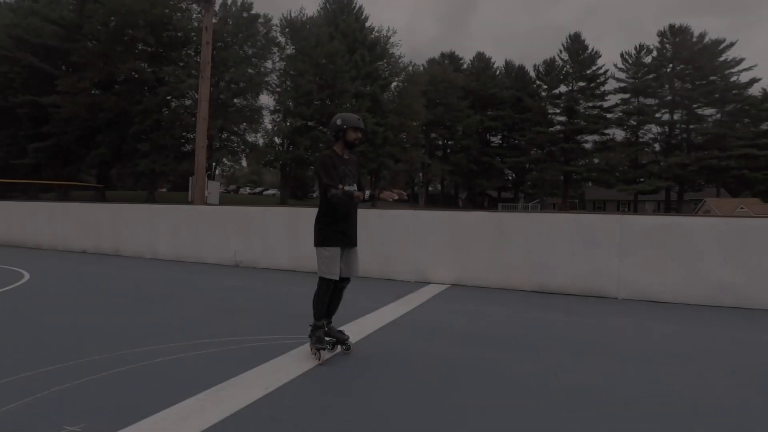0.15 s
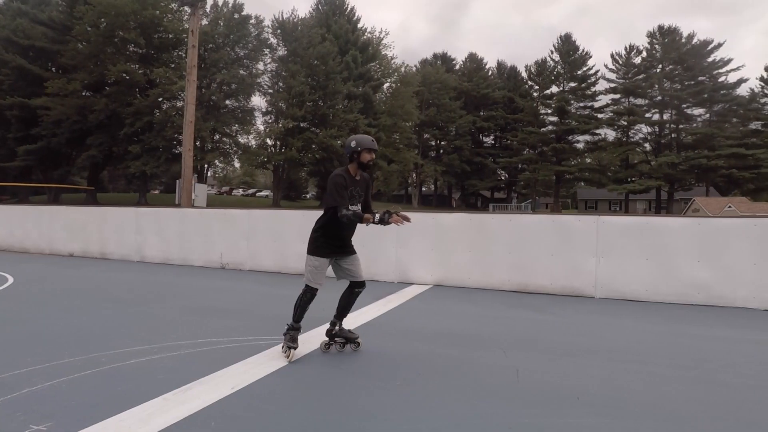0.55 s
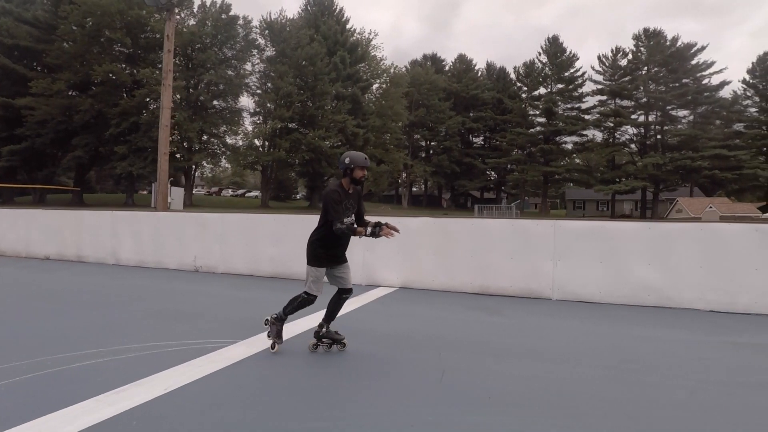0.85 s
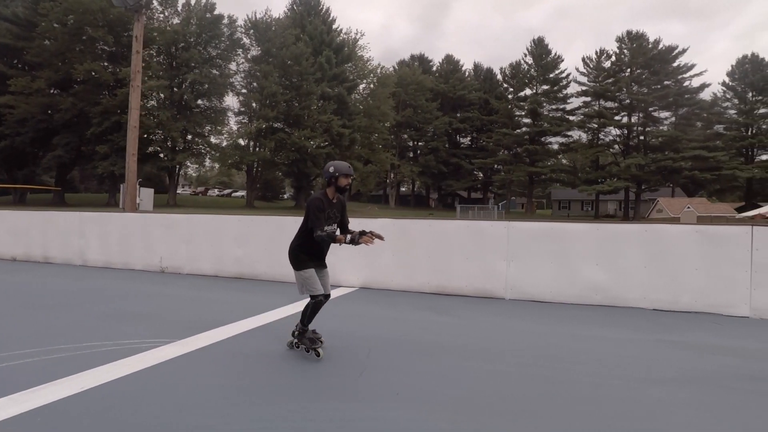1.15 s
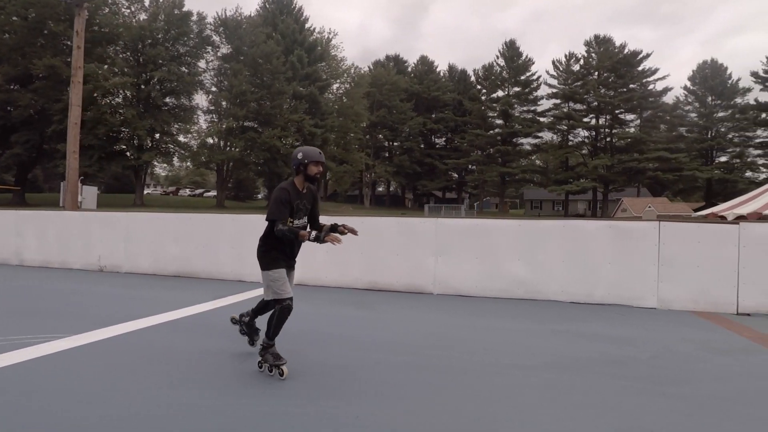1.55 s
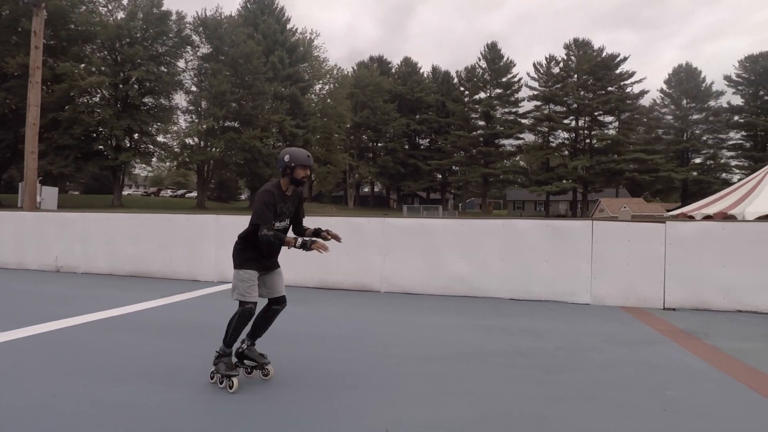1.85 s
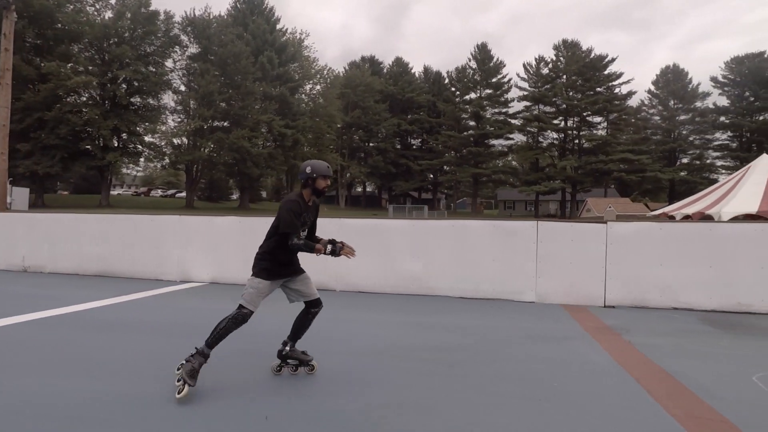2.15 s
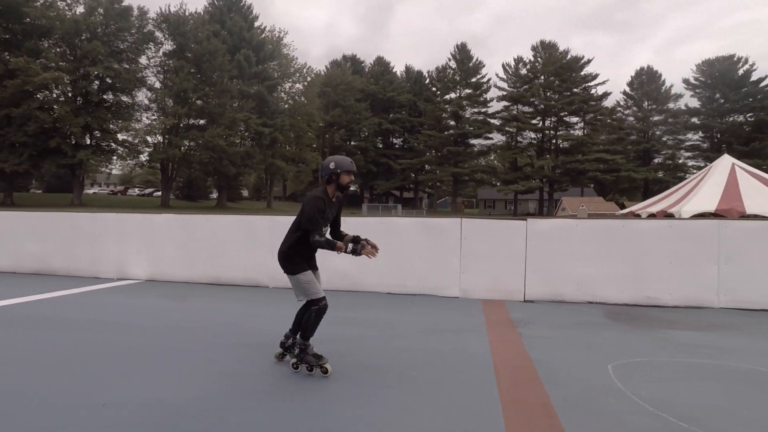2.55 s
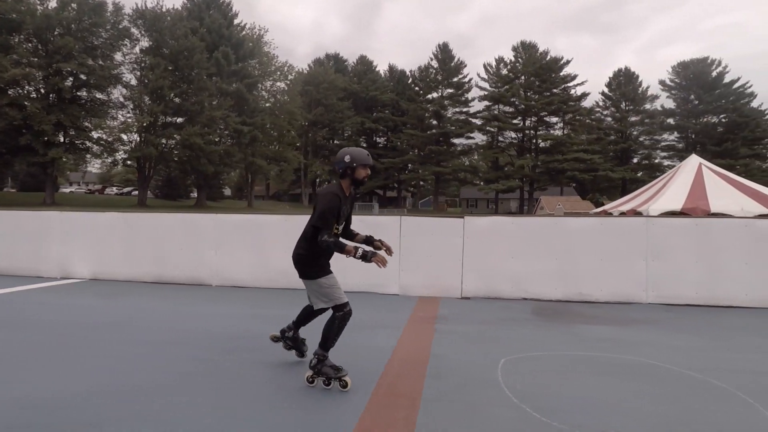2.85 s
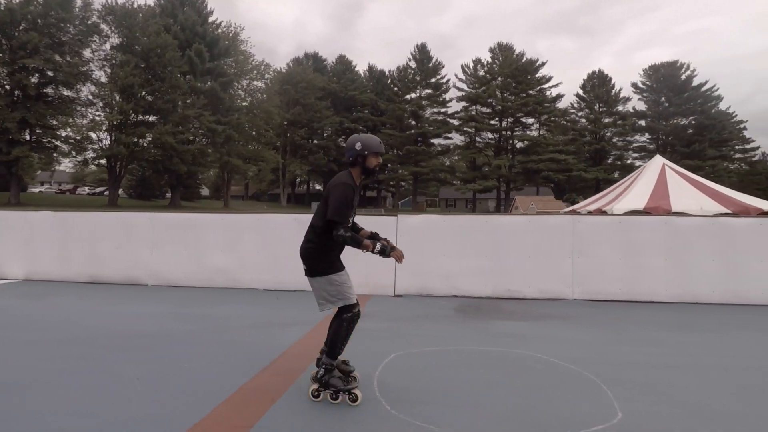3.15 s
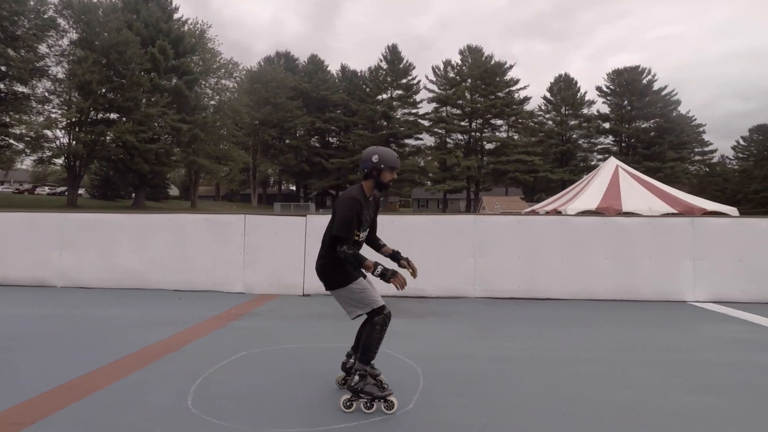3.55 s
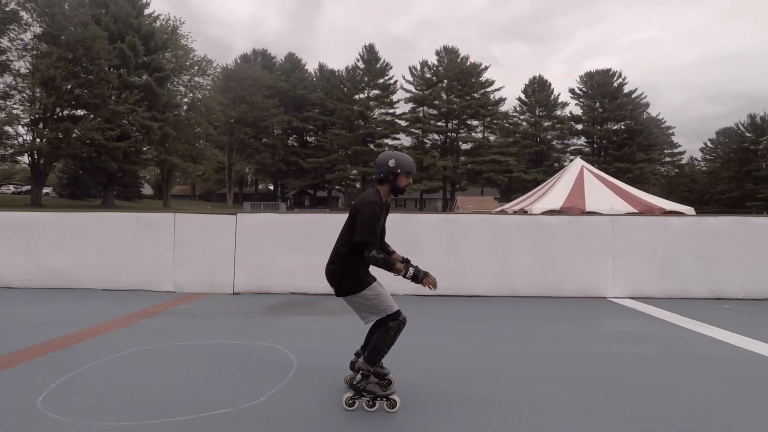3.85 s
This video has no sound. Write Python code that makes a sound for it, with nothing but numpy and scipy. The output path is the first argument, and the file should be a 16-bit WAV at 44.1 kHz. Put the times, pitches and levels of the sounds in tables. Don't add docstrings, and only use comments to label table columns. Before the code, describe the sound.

After an abrupt start at 0.05 seconds, inline skate wheels roll continuously over a hard outdoor rink, a low drone under grainy hiss. Dry ticks and short scuffs cluster around 0.2-0.5, 0.7-0.9 and 1.8-2.1, with tiny squeaks near 1.4 and 1.8. Wind gusts near 0.5, then strengthens from 2.8. Low mount knocks grow denser, heaviest around 2.8 and 3.2-3.5, over very faint electronic whine.

```python
import sys
import numpy as np
from scipy import signal
from scipy.fft import rfft, irfft, next_fast_len
from scipy.io import wavfile
from scipy.ndimage import uniform_filter1d, map_coordinates

SR = 44100
rng = np.random.default_rng(int(sys.argv[2]) if len(sys.argv) > 2 else 0)


def field_ratio(decibels):
    return 10 ** (np.asarray(decibels, dtype=float) / 20)


def materialize(psi):
    bounded = np.clip(np.atleast_2d(psi).T, -1, 1)
    quanta = np.round(bounded * 32767).astype(np.int16)
    wavfile.write(sys.argv[1], SR, quanta)


N = 176400
SPIN_UP_S = 0.21

# pitch_hz [Hz], width_hz [Hz], level_db [dB]
RIG_MODES = [(377.6, 40, 4), (759, 91, -4), (865, 66, -3), (978, 216, -10), (1276, 260, -11),
             (1606, 160, -4.5), (2040, 640, -13)]
# pitch_hz [Hz], density_db [dB per Hz]
AIR_SPECTRUM = [(6000, -48), (8000, -14), (10500, -10), (12500, -13), (14000, -17), (15600, -21)]


def unit(x):
    return x / np.sqrt(np.mean(x ** 2) + 1e-20)


def curve(rows):
    return np.interp(np.arange(N) / SR, *np.transpose(rows))


def wobble(rate):
    knot = np.arange(N) * min(rate, 200) / SR
    return map_coordinates(rng.standard_normal(1000), [knot])


def filtered(x, response):
    m = next_fast_len(N + SR // 4)
    spectrum = rfft(x, m) * response(np.fft.rfftfreq(m, 1 / SR))
    return irfft(spectrum, m)[..., :N]


def colour(points):
    f, v = np.transpose(points)
    return lambda hz: field_ratio(np.interp(np.log(hz + 1), np.log(f), v, left=-120, right=-120))


def rings(modes):
    def response(f):
        total = 0
        for k, (centre, width, db) in enumerate(modes):
            resonance = 1j * f * width / (centre * centre - f * f + 1j * f * width)
            total = total + (-1) ** k * field_ratio(db) * resonance
        return total
    return response


def low_pass(corner_hz, order):
    return lambda f: 1 / (1 + (f / corner_hz) ** order)


def rig_response(f):
    return rings(RIG_MODES)(f) * low_pass(2600, 4)(f)


def patchy(patchy_db):
    z = signal.stft(rng.standard_normal(N + 512), nperseg=512)[2]
    field = uniform_filter1d(rng.standard_normal(z.shape), 6, 0)
    field = uniform_filter1d(field, 10, 1)
    return unit(signal.istft(z * field_ratio(patchy_db * unit(field)), nperseg=512)[1][:N])


def grit():
    grains_per_s, size_spread_db = 2500, 3
    hit = rng.random(N) < grains_per_s / SR
    sign = np.sign(rng.standard_normal(N))
    return unit(hit * sign * field_ratio(size_spread_db * rng.standard_normal(N)))


def swell(middle_s, length_s):
    phase = (np.arange(N) / SR - middle_s) / length_s / 2.55
    return np.cos(np.pi * np.clip(phase, -.5, .5)) ** 2


def rolling():
    # time_s [s], level_db [dB]
    roll = [
        (0.05, -52),
        (0.31, -55),
        (0.73, -51.5),
        (0.91, -52.5),
        (1.58, -53),
        (2.01, -54.5),
        (3.26, -50),
        (4.0, -52),
    ]
    # pitch_hz [Hz], density_db [dB per Hz]
    drone_spectrum = [(59, -6), (100, -2), (135, 0), (161, 0), (194, -4.5), (376, -11.5), (520, -29),
                      (680, -71), (1140, -120)]
    # pitch_hz [Hz], density_db [dB per Hz]
    hiss_spectrum = [(1500, 0.5), (3000, 2.5), (3750, 3), (5000, 1), (6600, 5), (8000, -2), (10500, -5.5),
                     (13000, -42)]
    t = np.arange(N) / SR
    roll_db = curve(roll)
    grain_share = .3
    grains = np.sqrt(grain_share) * grit()

    def drive():
        return grains + np.sqrt(1 - grain_share) * patchy(patchy_db=0.5)

    rig = unit(filtered(drive(), rig_response))
    drone = field_ratio(10.5) * unit(filtered(patchy(patchy_db=1.0), colour(drone_spectrum)))

    spin_db = -16 * np.exp(-t / SPIN_UP_S)
    hiss = unit(filtered(drive(), colour(hiss_spectrum)))
    dull = filtered(hiss, low_pass(4000, 6))
    hiss_gain = field_ratio(-5.5 + 0.9 * wobble(5.92))
    hiss = hiss_gain * (field_ratio(spin_db / 2) * dull + field_ratio(spin_db) * (hiss - dull))

    air_db = -18.5 - 26 * np.exp(-t / .3)
    air = field_ratio(air_db) * unit(filtered(patchy(patchy_db=.7), colour(AIR_SPECTRUM)))
    air = air * field_ratio(roll_db.mean() - roll_db)
    return field_ratio(roll_db + 1.56 * wobble(5.625)) * (rig + drone + hiss + air)


def bearings():
    # time_s [s], level_db [dB]
    load = [(.74, -80), (.85, -53), (.95, -76), (1.28, -57), (1.47, -61), (1.75, -56.5), (2, -56.5),
            (2.2, -71), (2.51, -80), (2.54, -52.5), (2.78, -51.5), (2.85, -54), (3.09, -51), (3.12, -56),
            (3.15, -51.5), (3.72, -52.5), (3.8, -56.5), (4, -53)]
    # pitch_hz [Hz], width_hz [Hz], level_db [dB]
    races = [(3770, 160, -4), (4800, 900, -14), (6250, 360, 0), (6850, 500, -7)]
    load_db = curve(load)
    peak_db = load_db.max()
    level_db = peak_db + 1.54 * (load_db - peak_db) - 3 + 0.5 * wobble(24.73)
    fade = np.clip(np.arange(N) / SR / SPIN_UP_S, 0, 1) ** 2
    hiss = filtered(patchy(patchy_db=2.0), lambda f: rings(races)(f) * low_pass(8000, 8)(f) * f / (f + 3000))
    return fade * field_ratio(level_db) * unit(hiss)


def scuffs():
    # middle_s [s], length_s [s], level_db [dB], brightness_db [dB on the bright part
    drags = [(0.234, 0.047, -59, -0.5), (0.47, 0.073, -57, -1), (0.706, 0.025, -55, -0.5),
             (0.75, 0.024, -49.5, -0.5), (0.875, 0.057, -61, 5), (1.006, 0.12, -64, 2),
             (1.163, 0.016, -57.5, -2), (1.229, 0.023, -58.5, -1.5), (1.378, 0.015, -56.5, 0),
             (1.785, 0.035, -58.5, -0.5), (1.819, .008, -57, 5), (1.828, 0.037, -53, -0.5),
             (1.889, 0.032, -63.5, -2), (1.994, 0.11, -59.5, -2), (2.062, 0.024, -66, 5),
             (2.098, 0.033, -60.5, 1), (2.254, 0.017, -66.5, -4.5), (2.524, 0.026, -62, 7),
             (2.7, 0.12, -58, -0.5), (2.886, 0.025, -60, 4.5), (2.959, 0.092, -53, 1.5),
             (3.32, 0.28, -62, -2.5), (3.51, 0.069, -65, 2)]
    # pitch_hz [Hz], density_db [dB per Hz]
    rub_spectrum = [(200, 21), (400, 16.5), (700, -16), (2000, 0), (3000, 1.5), (4500, 5.5), (6500, 4),
                    (9000, -3.5), (15000, -40)]
    friction = patchy(patchy_db=.7) * field_ratio(2.5 * wobble(150)) + .5 * grit()
    rub = filtered(friction, colour(rub_spectrum))
    rub = rub / np.std(filtered(rub, lambda f: f > 600))
    rub_low = filtered(rub, low_pass(3000, 4))
    bright = rub - rub_low
    rig_db = 1
    dull = rub_low + field_ratio(rig_db) * unit(filtered(friction, rig_response))
    out = np.zeros(N)
    for middle_s, length_s, db, tilt_db in drags:
        burst = field_ratio(-3 * tilt_db) * dull + field_ratio(tilt_db) * bright
        out += swell(middle_s, length_s) * field_ratio(db) * burst
    return out


def ticks():
    # time_s [s], crack_db [dB], ring_db [dB]
    stones = [(0.1807, -47, -58), (0.2034, -41, -58), (0.2104, -44, -60), (0.2166, -46, -51),
              (0.222, -41, -56), (0.2268, -44, -58), (0.233, -45, -55), (0.248, -43, -51),
              (0.265, -39, -55), (0.386, -43, -64), (0.4608, -46, -55), (0.4754, -37, -51),
              (0.7044, -37, -55), (0.711, -38, -57), (0.721, -38, -51), (0.744, -42, -50),
              (0.7484, -45, -52), (0.7684, -39, -51), (0.7983, -34, -54), (0.8704, -42, -53),
              (0.9044, -44, -49), (1.3653, -42, -62), (1.7874, -43, -53), (1.812, -36, -52),
              (1.8177, -44, -49), (1.855, -41, -46), (2.0552, -38, -56), (2.2428, -44, -52),
              (2.4085, -37, -55), (3.1438, -36, -53)]
    # pitch_hz [Hz], width_hz [Hz], level_db [dB]
    ring_modes = [(1730, 153, 0)]
    # pitch_hz [Hz], width_hz [Hz], level_db [dB]
    crack_modes = [(4300, 2500, 0), (6700, 1800, -1)]
    s, crack_db, ring_db = np.transpose(stones)
    at = np.round(s * SR).astype(int)
    step = np.arange(132)
    puff = rng.standard_normal((len(s), 132)) * np.exp(-step / SR / .0007)
    cracks, blows = np.zeros(N), np.zeros(N)
    np.add.at(cracks, at[:, None] + step, field_ratio(crack_db)[:, None] * puff)
    blows[at] = field_ratio(ring_db + 2.5) * SR / 400
    ringing = filtered(blows, lambda f: rings(ring_modes)(f) * f / (f + 900))
    return filtered(cracks, rings(crack_modes)) + ringing


def squeaks():
    # middle_s [s], length_s [s], pitch_hz [Hz], level_db [dB]
    slips = [
        (.82, .03, 5900, -60),
        (1.093, .014, 6650, -55),
        (1.369, .011, 3800, -46),
        (1.395, .008, 3650, -55),
        (1.378, .004, 4600, -58),
        (1.82, .006, 6500, -50),
        (1.855, .004, 7100, -52),
        (2.058, .008, 5300, -50),
        (2.708, .008, 2300, -53),
    ]
    t = np.arange(N) / SR
    rough = 1 + .55 * unit(filtered(rng.standard_normal(N), lambda f: f < 500))
    sag = .08
    tones = np.zeros(N)
    for middle_s, length_s, hz, db in slips:
        u = t - middle_s
        bend = 1 - sag * np.clip(u / length_s, -1, 1) / 2
        tones += field_ratio(db) * swell(middle_s, length_s) * np.sin(2 * np.pi * hz * u * bend)
    return rough * tones


def sprays():
    # middle_s [s], length_s [s], level_db [dB]
    swishes = [
        (0.79, .06, -60.5),
        (0.924, 0.13, -62.5),
        (1.72, 0.066, -66),
        (1.967, 0.13, -67),
        (2.7, .045, -61.5),
        (2.936, 0.071, -67),
    ]
    # pitch_hz [Hz], width_hz [Hz], level_db [dB]
    dust_band = [(8350, 3200, 0)]
    dust = unit(filtered(patchy(patchy_db=1), lambda f: rings(dust_band)(f) ** 2))
    return dust * sum(field_ratio(db) * swell(s, length) for s, length, db in swishes)


def whirrs():
    # middle_s [s], length_s [s], level_db [dB]
    lifts = [
        (.97, .26, -71),
        (1.78, .24, -72),
        (3.48, .22, -73),
        (4, .12, -72),
    ]
    # pitch_hz [Hz], width_hz [Hz], level_db [dB]
    whirr_band = [(12100, 1400, 0)]
    spray_db = [
        3,
        -2,
        -8,
        -9,
    ]
    hiss = unit(filtered(patchy(patchy_db=1), lambda f: rings(whirr_band)(f) ** 3))
    spray = unit(filtered(patchy(patchy_db=1), colour(AIR_SPECTRUM)))
    out = np.zeros(N)
    for (middle_s, length_s, db), air_db in zip(lifts, spray_db):
        out += field_ratio(db) * swell(middle_s, length_s) ** .7 * (hiss + field_ratio(air_db) * spray)
    return out


def wind():
    # time_s [s], strength_db [dB], sharpness_db [dB]
    gusts = [(0.05, -33, -5), (0.46, -36.5, 6.5), (0.479, -18, -3.5), (0.64, -38.5, -3), (0.67, -32.5, 4.5),
             (1.5, -30.5, -4), (1.55, -25, -3), (1.8, -31, -1), (2.25, -32, -6), (2.83, -17.5, -2.5),
             (2.94, -21.5, 0), (3.45, -14, 1), (3.5, -17.5, 3.5), (3.76, -25, 4.5), (3.83, -19, -2.5),
             (4.0, -20, 4)]
    # pitch_hz [Hz], density_db [dB per Hz]
    buffet_spectrum = [(8.8, -56), (15, -9.5), (49, 0), (124, -9.5), (266, -27), (336, -53), (378, -33),
                       (445, -76), (500, -52), (650, -87), (1100, -120)]
    s, strength_db, sharp_db = np.transpose(gusts)
    lumps = field_ratio(0.5 * wobble(17))
    buffet = filtered(patchy(patchy_db=0.5), colour(buffet_spectrum))
    slow = filtered(buffet, low_pass(55, 4))
    tilt = field_ratio(curve(np.c_[s, sharp_db]))
    flapping = unit(lumps * (slow / tilt + (buffet - slow) * tilt))
    return field_ratio(curve(np.c_[s, strength_db]) - 2) * flapping


def thumps():
    # time_s [s], level_db [dB], pitch_hz [Hz]
    knocks = [(0.077, -26.5, 145.0), (0.102, -20.5, 96), (0.321, -24.5, 247), (0.42, -20, 103.0),
              (0.473, -15.5, 129), (0.531, -27, 313), (0.559, -25, 334), (0.723, -20, 303),
              (0.744, -22.5, 196), (0.77, -19.5, 325), (0.854, -13.5, 137), (1.153, -15, 190.8),
              (1.536, -8.5, 44.8), (1.613, -17.5, 111.4), (1.723, -16, 30.0), (1.801, -10.5, 28.5),
              (1.814, -19.5, 316), (1.849, -27.5, 340), (1.89, -13, 55), (1.906, -20.5, 181),
              (1.966, -16.5, 110.3), (2.074, -15, 30.0), (2.237, -24.5, 143), (2.328, -23.5, 151),
              (2.42, -11.5, 61.4), (2.475, -8.5, 86.7), (2.599, -19, 44.7), (2.628, -18, 98),
              (2.648, -8.5, 42.6), (2.69, -10.5, 82.4), (2.724, -15.5, 129), (2.816, -0.5, 53),
              (2.927, -10, 129), (2.958, -14, 123), (3.001, -10.5, 29.3), (3.063, -8.5, 112),
              (3.137, -8, 79.6), (3.173, -10, 185), (3.196, -4, 85.6), (3.26, -1, 47.2),
              (3.269, -11, 126.5), (3.306, -4.7, 66), (3.385, 2.7, 92.6), (3.426, 0, 52.3),
              (3.538, -9.5, 29.7), (3.6, -15, 28.2), (3.655, -10.5, 138), (3.674, -11, 106),
              (3.79, -8, 124.6), (3.833, -3, 69), (3.901, -3.5, 111), (3.956, -10, 145.0)]
    decay_cycles = 3.5
    out = np.zeros(N)
    for s, db, hz in knocks:
        cycles = np.clip(np.arange(N) / SR - s, 0, None) * hz
        envelope = cycles * np.exp(-cycles * 4 / decay_cycles)
        out += field_ratio(db - 2.0) * envelope * np.sin(2 * np.pi * cycles)
    return out


def whine():
    # pitch_hz [Hz], level_db [dB rms]
    tones = [(1000, -72), (7000, -79), (14625, -103)]
    t = np.arange(N) / SR
    hum = sum(field_ratio(db + 5.5) * np.sin(2 * np.pi * hz * t) for hz, db in tones)
    return hum * np.clip(t / 1.8, 0, 1)


def housing(f):
    # pitch_hz [Hz], width_hz [Hz], depth [0-1]
    dips = [(556, 32.4, 0.8), (1134, 23.3, 0.47), (801, 20, 0.5), (447.6, 6.5, 1)]
    # pitch_hz [Hz], width_hz [Hz], level_db [dB]
    mount = (132, 14, 3.4)
    mount_hz, mount_width_hz, mount_db = mount
    gain = 1 + (field_ratio(mount_db) - 1) * np.exp(-((f - mount_hz) / mount_width_hz) ** 2)
    for hz, width, depth in dips:
        gain = gain * (1 - np.clip(depth, 0, .9) * np.exp(-((f - hz) / width) ** 2))
    return gain


def ragged(x):
    # time_s [s], edge_hz [Hz]
    edge = [(.05, 10800), (.13, 12700), (.2, 13200), (.3, 13000), (.34, 14050), (.71, 14100), (.74, 14650),
            (.92, 15100), (4, 15050)]
    wander_hz, dropout_hz = 160, 1100
    hz, t, z = signal.stft(x, SR, nperseg=1024)
    wander = np.interp(t, np.arange(120) / 25, rng.standard_normal(120))
    edge_hz = np.interp(t, *np.transpose(edge)) + wander_hz * wander
    luck = uniform_filter1d(rng.standard_normal(z.shape[1:]), 3, 0)
    luck = unit(uniform_filter1d(luck, 4, 1))
    room_hz = np.minimum(edge_hz, 15220) - hz[:, None]
    keep = room_hz > dropout_hz * np.clip(luck - .2, 0, None)
    return signal.istft(z * np.maximum(keep, .003), SR, nperseg=1024)[1][:, :N]


def scene():
    skates = rolling() + bearings() + scuffs() + ticks() + squeaks() + sprays() + whirrs()
    return (skates + wind() + thumps() + whine())[None]


def band_limit(x):
    return signal.sosfilt(signal.butter(12, 16070, fs=SR, output="sos"), x)


def record(dry):
    start_s = .0464
    mix = ragged(filtered(dry, housing)) * (np.arange(N) >= start_s * SR)
    return band_limit(mix)


dry = scene()
out = record(dry)
materialize(out)
```